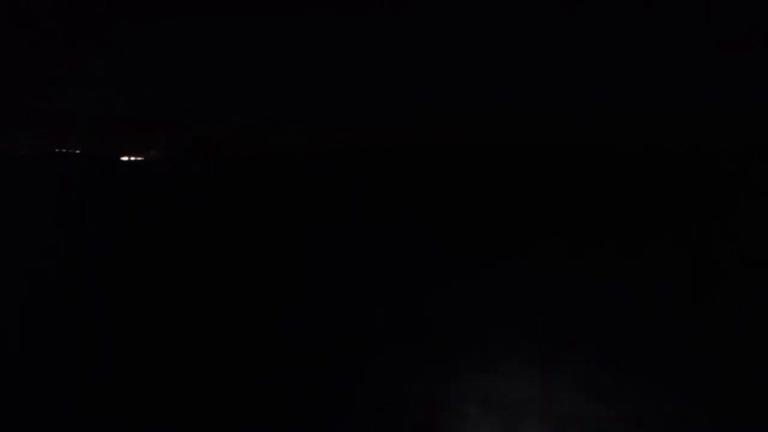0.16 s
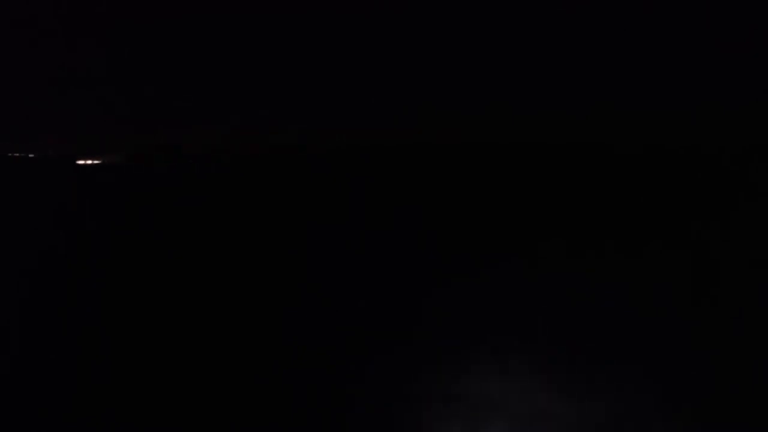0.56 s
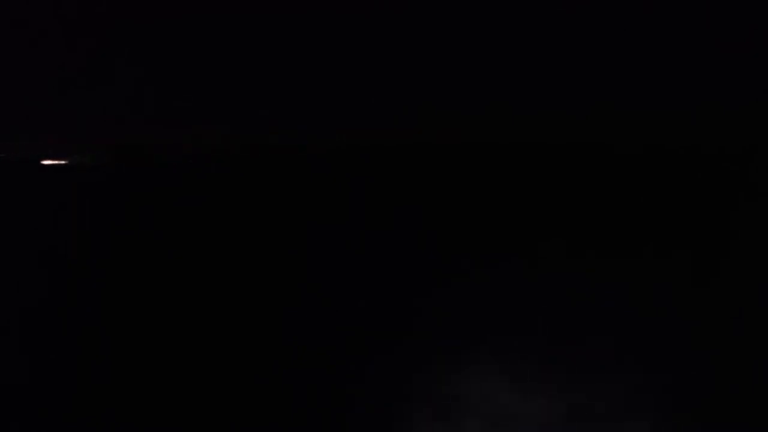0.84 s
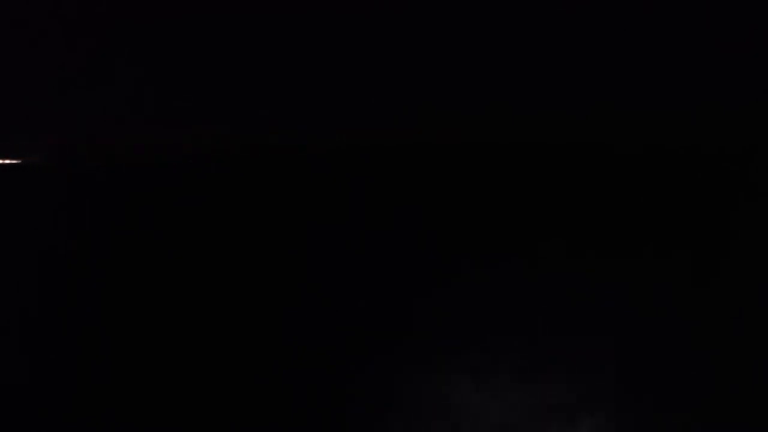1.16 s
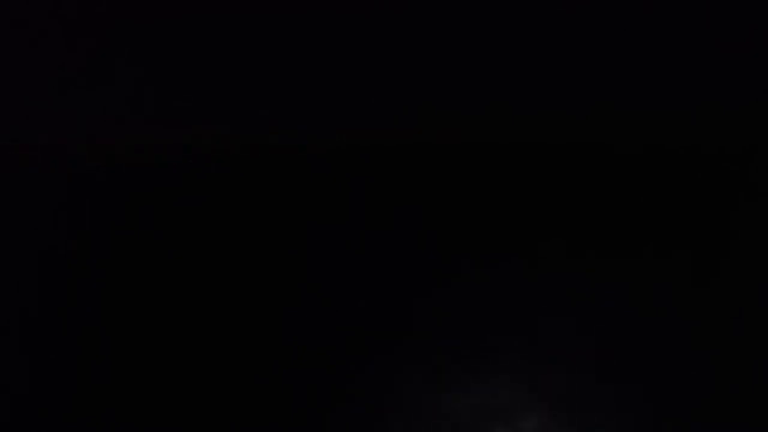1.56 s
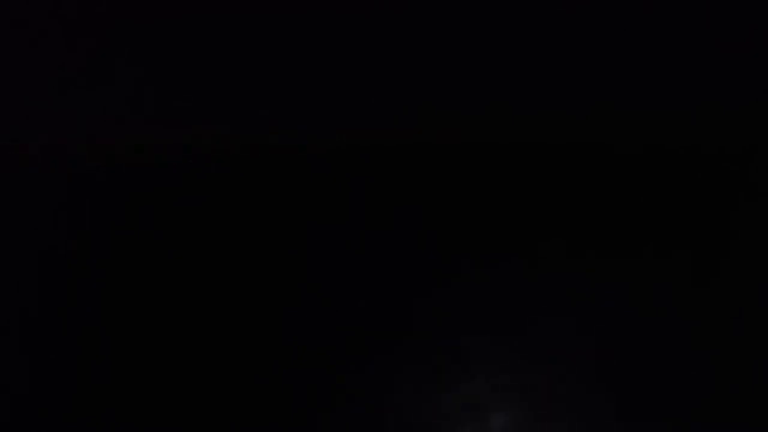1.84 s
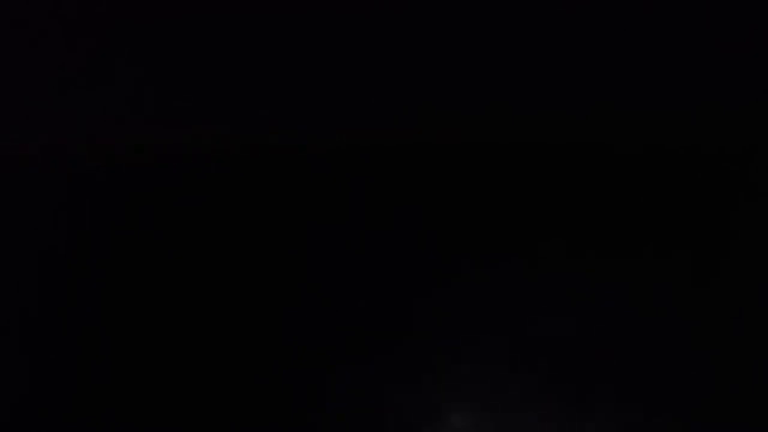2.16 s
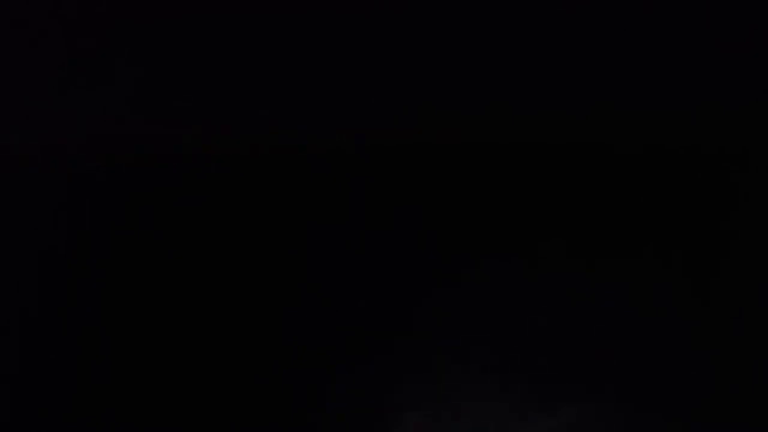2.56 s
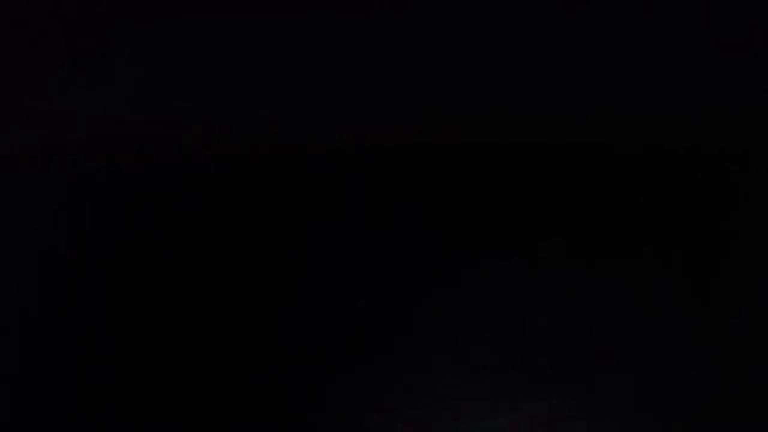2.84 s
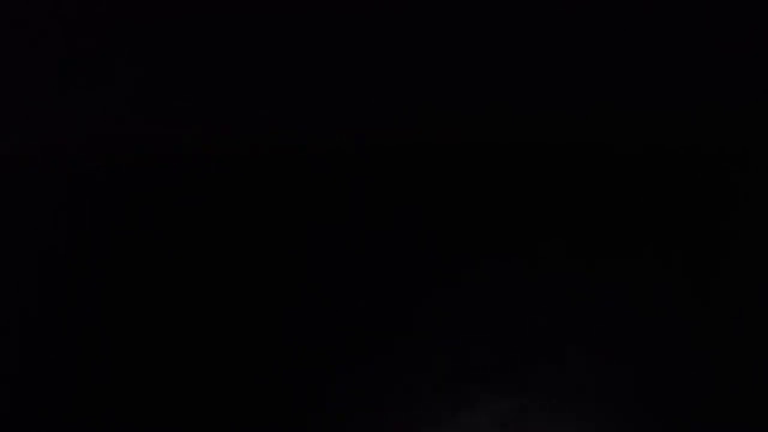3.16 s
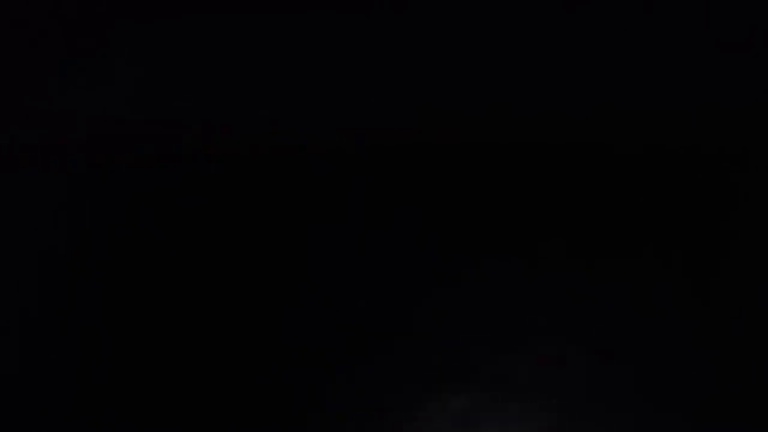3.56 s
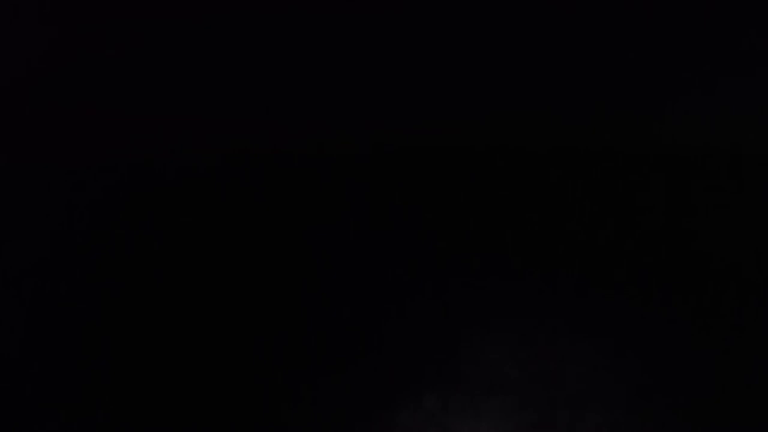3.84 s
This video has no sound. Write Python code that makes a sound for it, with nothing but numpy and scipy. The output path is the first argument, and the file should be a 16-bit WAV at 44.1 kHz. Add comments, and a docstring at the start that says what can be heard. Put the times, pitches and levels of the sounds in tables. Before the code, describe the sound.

Several toads trill in overlapping bursts of rapid, hollow clicks, nearest on the left, neighbours on the right, fainter ones beyond; open field at night, close stereo microphone, light diffuse echo, low rumble and faint hiss.

```python
"""Toads trill together in an open field at night: two on the left, several on the right, more beyond.
Each trill is a run of clicks; a click rings the vocal sac for a few milliseconds as its pitch drops,
with a short noisy rasp at its start. One short, high chip sounds in the centre.
The ground scatters the calls, over a low distant rumble and faint hiss."""
import sys
import numpy as np
from scipy import signal
from scipy.fft import rfft, irfft
from scipy.io import wavfile

SR = 44100
rng = np.random.default_rng(int(sys.argv[2]) if len(sys.argv) > 2 else 0)


def unload_audio(sound):
    """Save the sound as a 16-bit wav file, at the path given as the first command line argument."""
    columns = np.transpose(np.atleast_2d(sound))
    # keep every value between -1 and 1, then stretch to whole-number steps
    steps = np.round(np.clip(columns, -1, 1) * 32767)
    wavfile.write(sys.argv[1], SR, steps.astype(np.int16))


N = 175959  # samples, about 4 s

# Click levels in these tables are ring levels ahead of the throat filter and panning.
# clicks of the nearest toad, on the left: start_s, level_db
LEFT_CLICKS = [(0.0127, -17.5), (0.0526, -15.5), (0.085, -16), (0.1173, -14.5), (0.1493, -13.5),
               (0.1814, -13.5), (0.2161, -14.5), (0.248, -16.5), (0.2871, -16.5), (0.3007, -20.5),
               (0.6003, -15), (0.6458, -16.0), (0.6773, -15.5), (0.7069, -15.5), (0.7392, -15.5),
               (0.7757, -16), (0.8175, -15), (0.8466, -14.0), (0.8779, -15.5), (0.9166, -14.5),
               (0.9479, -14), (0.9779, -11.5), (1.0087, -21.5), (1.0469, -10.5), (1.0848, -13.5),
               (1.1111, -15), (1.1408, -14.5), (1.1803, -19), (1.4627, -17.0), (1.4931, -15.5),
               (1.5279, -16.5), (1.5627, -15.5), (1.5905, -14.5), (1.6219, -14.5), (1.6587, -14),
               (1.6865, -14), (1.7161, -15), (1.7464, -15), (1.7803, -13.5), (1.8098, -18.5),
               (1.8408, -14.0), (1.8763, -13.5), (1.9021, -15.5), (1.9284, -12.5), (1.9598, -14.5),
               (1.9959, -16.5), (2.2562, -18), (2.2851, -16), (2.3168, -17.5), (2.3607, -14.5),
               (2.3876, -15.5), (2.4168, -17.5), (2.4502, -16.5), (2.4881, -17.5), (2.5194, -13.5),
               (2.548, -15.5), (2.579, -16), (2.6112, -16.5), (2.6441, -13.5), (2.6729, -14),
               (2.7042, -14.5), (2.7313, -13.5), (2.7627, -15), (2.8041, -21.5), (2.8114, -16),
               (3.0578, -17), (3.1204, -14.5), (3.164, -16.5), (3.1886, -16.5), (3.2153, -12),
               (3.2459, -16.5), (3.2826, -15.5), (3.3116, -14.5), (3.3408, -15.5), (3.3734, -14.5),
               (3.4032, -15), (3.4316, -15.5), (3.4628, -16.5), (3.5026, -15.5), (3.5274, -20),
               (3.5536, -16), (3.5846, -16.5), (3.5986, -20), (3.8826, -17.5), (3.9135, -15),
               (3.9575, -15.0), (3.9837, -18)]
# its pitch as it drifts: time_s, pitch_hz
LEFT_PITCH = [(.2, 1544), (.7, 1530), (1.1, 1553), (1.65, 1519), (1.9, 1540), (2.3, 1486), (2.7, 1539),
              (3.15, 1500), (3.5, 1518), (3.9, 1474)]
# the microphone turns, so the left voices move further left: time_s, left_minus_right_db
LEFT_PAN = [(0, 4.5), (1.6, 7.5)]
# clicks of a softer, lower toad behind the nearest: start_s, level_db
BEHIND_CLICKS = [(0.2946, -24), (0.4535, -24.0), (0.479, -25.5), (0.5068, -24.5), (0.5358, -23),
                 (0.594, -27), (0.6245, -24.0), (0.661, -20.5), (0.7164, -24.5), (1.1986, -18.5),
                 (1.2195, -27), (1.3009, -19), (1.3592, -25), (1.7598, -23), (2.0193, -22.5),
                 (2.4053, -22.5), (2.4959, -24.5), (2.5897, -19.5), (2.757, -24.5), (2.787, -23),
                 (3.0874, -18), (3.1499, -24), (3.2384, -22), (3.2626, -26.5), (3.2938, -24), (3.3289, -24),
                 (3.3528, -27), (3.3813, -24.5), (3.442, -21.5), (3.539, -25.5), (3.6208, -23),
                 (3.8556, -18), (3.9355, -24)]
BEHIND_HZ = 1498.5
# clicks of the neighbours on the right: start_s, level_db
RIGHT_CLICKS = [(0.0203, -20.5), (0.029, -24.5), (0.0646, -17.5), (0.0733, -25.5), (0.1063, -22.5),
                (0.1115, -18.5), (0.1525, -23.5), (0.1909, -16), (0.2364, -18), (0.2748, -18.5),
                (0.3146, -17), (0.3261, -20), (0.362, -18.5), (0.4026, -20.5), (0.4314, -23),
                (0.4416, -16.5), (0.4661, -23), (0.4888, -19), (0.5239, -13.5), (0.5508, -19.5),
                (0.5632, -15), (0.5758, -23.5), (0.8721, -22), (0.8944, -20), (0.9293, -19),
                (0.9398, -23.5), (1.1261, -18), (1.1624, -15), (1.2035, -19), (1.237, -17.5),
                (1.2412, -19.5), (1.2671, -23.5), (1.2775, -16.5), (1.3178, -22), (1.3474, -23.5),
                (1.3689, -24.5), (1.3968, -20), (1.4224, -21.5), (1.4498, -24), (1.4765, -27.5),
                (1.5082, -31), (1.5404, -31.5), (1.7236, -20.0), (1.7748, -20.5), (1.8481, -19.5),
                (1.8903, -17), (1.9717, -20), (2.0085, -17), (2.0428, -22.5), (2.0548, -20.5),
                (2.0746, -21), (2.0986, -18.5), (2.1194, -23.5), (2.1393, -19.0), (2.1719, -23),
                (2.1841, -19.0), (2.1961, -25), (2.2201, -18.5), (2.231, -26.5), (2.2651, -17.5),
                (2.3014, -23.5), (2.3282, -24.0), (2.4358, -24.5), (2.4651, -22), (2.6992, -21),
                (2.7755, -19.5), (2.8238, -18.5), (2.866, -19), (2.9133, -20), (2.9521, -18.0),
                (3.0001, -19.5), (3.045, -19.5), (3.0846, -17), (3.1746, -19.5), (3.4202, -21.5),
                (3.4503, -24.5), (3.4914, -23), (3.5656, -18), (3.6138, -18.5), (3.6451, -22.5),
                (3.6536, -16.5), (3.6697, -21.5), (3.6988, -13.5), (3.734, -17.5), (3.7783, -17),
                (3.8233, -16), (3.8585, -18), (3.9019, -18.5), (3.9422, -16), (3.9777, -16)]
# pitch the right-hand clicks follow: time_s, pitch_hz
RIGHT_PITCH = [(.9, 1490), (1.2, 1554), (1.45, 1490), (2.202, 1554), (2.451, 1520), (2.95, 1534),
               (3.45, 1530), (3.85, 1557)]
# clicks of a small, bright-voiced toad on the right, in two calls: start_s, level_db
SMALL_CLICKS = [(0.01, -21), (0.049, -19.5), (0.0825, -21.5), (0.1274, -20.5), (0.1593, -19.5),
                (0.1971, -21), (0.2411, -20.0), (0.2773, -20.5), (0.3166, -20), (0.3507, -21),
                (0.39, -21.5), (0.425, -20), (0.4733, -24.5), (0.8435, -25), (0.8753, -21), (0.9088, -22.5),
                (0.948, -25), (0.9899, -20.5), (1.0238, -21.0), (1.0615, -20), (1.0951, -18.5),
                (1.1356, -18.5), (1.1703, -18), (1.2078, -19), (1.2445, -18), (1.2952, -23)]
SMALL_HZ = 1682.5

# further ring tones of each voice: pitch_multiple, level_db (relative to the main tone)
LEFT_OVERTONES = [(1.922, -33.5), (2.401, -38), (3.4, -49)]
RIGHT_OVERTONES = [(1.92, -28.5), (2.35, -33.5), (3.4, -38)]
SMALL_OVERTONES = [(0.909, -9.5), (1.999, -14)]
# the throat passes little below the ring and dips above it: frequency_hz, gain_db
THROAT = [(1050, -11.5), (1450, 0.5), (1900, -1), (2350, -5)]
# colour of the rasp at the start of each click: frequency_hz, gain_db
RASP_COLOUR = [(1000, -20), (3300, 7.5), (4400, -5.5), (5350, 0), (6500, -18), (9800, -8.5), (15000, -31.5)]
RASP_S = 0.0029  # time scale of the rasp's rise and fall
CHIRP, CHIRP_S = 0.053, 0.0054  # typical share a click starts sharp, and its settling time in s
PITCH_SCATTER = 0.01  # random spread of pitch from click to click, as a share
RING_SHAPE = 1.8  # exponent of the ring's decay

# toads farther off: nominal pitch, nominal click rate, middle level and spread either way
FAR_HZ, FAR_CLICKS_PER_S, FAR_DB, LEVEL_SCATTER_DB = 1541, 32, -32.5, 3
# gain on the farther toads, which fall quiet at times: time_s, gain_db
FAR_LEVEL = [(.66, 6), (.8, -23.5), (.9, 6), (2.1, -2), (3.6, 2), (3.75, -16)]
CHIP_S, CHIP_HZ, CHIP_DB, CHIP_DECAY_S = 2.7545, 3570, -39.5, 0.0038

# near and far echoes: level, decay time
SCATTER_DB, SCATTER_S, FIELD_DB, FIELD_S = -14, 0.004, -20, 0.074
# night background common to both sides: frequency_hz, level_db_per_hz (before the rumble swells)
NIGHT_MID = [(30, -101), (50, -83.5), (63, -88), (120, -80.5), (200, -76.5), (350, -88.5), (560, -86.5),
             (950, -90), (2600, -102), (3300, -99), (4400, -110), (5350, -104), (6500, -118), (7300, -117),
             (7700, -109), (8500, -113), (9000, -124), (9800, -106), (10700, -117), (15000, -126)]
# night background with opposite sign on the two sides: frequency_hz, level_db_per_hz (likewise)
NIGHT_SIDE = [(30, -112), (130, -93), (430, -91), (560, -83.5), (780, -88.5), (940, -72), (1200, -81.5),
              (2600, -101), (3600, -100), (4400, -111), (5400, -107), (6600, -120), (8300, -118),
              (9000, -126), (9800, -114), (13000, -129)]
# gain riding the low-mid rumble: time_s, gain_db
RUMBLE_LEVEL = [(.2, 4), (0.349, 4.5), (.5, 3), (.8, 4.5), (1.2, 1.5), (3.549, 3), (3.85, 5)]
TOP_HZ = 15200  # upper edge of the sound


def left_toad():
    """The nearest toad, round and clean, its pitch drifting from call to call, with a lower one behind it."""
    nearest = pitched(LEFT_CLICKS, LEFT_PITCH)
    behind = [(start, db, BEHIND_HZ) for start, db in BEHIND_CLICKS]
    return trill(nearest + behind, LEFT_OVERTONES, curve(LEFT_PAN),
                 attack_s=0.0011, decay_s=0.0061, rasp_db=-47)


def right_toads(pan_db=-10.0):
    """Neighbours whose trills interleave, with a harder tick."""
    clicks = pitched(RIGHT_CLICKS, RIGHT_PITCH)
    return trill(clicks, RIGHT_OVERTONES, pan_db, attack_s=0.00093, decay_s=0.0062, rasp_db=-43.5)


def small_toad(pan_db=-12):
    """A higher voice with two close ring tones and a strong octave."""
    clicks = [(start, db, SMALL_HZ) for start, db in SMALL_CLICKS]
    return trill(clicks, SMALL_OVERTONES, pan_db, attack_s=0.0014, decay_s=0.0062, rasp_db=-46.5)


def trill(clicks, overtones, pan_db, attack_s, decay_s, rasp_db):
    """Clicks (s, dB, Hz) of one voice: a tick, then the sac swells, rings and sags in pitch."""
    rings, ticks = np.zeros((2, N)), np.zeros((2, N))
    lag = np.array([[0], [1 / SR]])  # the right ear hears one sample later
    t = np.maximum(np.arange(900) / SR - lag, 0)  # each click lasts about 20 ms
    snap = t / RASP_S * np.exp(1 - (t / RASP_S) ** 2)
    for (start, db, hz), luck in zip(clicks, rng.standard_normal((len(clicks), 8))):
        # each click differs a little in attack, decay, pitch and sag
        click_attack_s = attack_s * np.exp(0.16 * luck[-1])
        click_decay_s = decay_s * np.exp(0.12 * luck[0])
        click_hz = hz * (1 + PITCH_SCATTER * luck[1])
        click_chirp = CHIRP * np.exp(0.2 * luck[-2])

        swell = (1 - np.exp(-(t / click_attack_s) ** 2)) ** 2
        # the ring holds briefly, then dies ever faster
        ring = swell * np.exp(-(t / click_decay_s) ** RING_SHAPE)
        ring = ring / ring.max()
        # extra phase from starting sharp and settling to the pitch
        sag = click_chirp * CHIRP_S * (1 - np.exp(-t / CHIRP_S))
        phase = 2 * np.pi * click_hz * (t + sag)
        upper = sum(undb(tone_db) * np.sin(multiple * phase + offset)
                    for (multiple, tone_db), offset in zip(overtones, luck[2:]))
        add(rings, start, undb(db) * ring * (np.sin(phase) + ring * upper))  # overtones die sooner
        add(ticks, start, undb(db / 2) * snap)  # the tick varies less than the ring
    voice = colour(rings, THROAT)
    rasp = undb(rasp_db) * colour(ticks * rng.standard_normal(N), RASP_COLOUR)
    # positive pan softens the right ear, negative the left
    ears = undb(np.minimum(np.array([[1], [-1]]) * pan_db, 0))
    return ears * (voice + rasp)


def pitched(clicks, pitch):
    """Give each click the pitch that the voice has at that moment."""
    times, hz = np.array(pitch).T
    return [(start, db, np.interp(start, times, hz)) for start, db in clicks]


def chip():
    """A single high, short chip in the centre, rung like a toad's click."""
    return trill([(CHIP_S, CHIP_DB, CHIP_HZ)], [], 0,
                 attack_s=0.00072, decay_s=CHIP_DECAY_S, rasp_db=-51.5)


def far_toads(pan_db=6):
    """Faint trills on either side, uneven in time, strength and pitch."""
    out = 0
    for side in (1, -1):
        gap, size, turn = rng.uniform(-1, 1, (160, 3)).T  # enough clicks to outlast the scene
        times = np.cumsum(np.exp(gap / 2)) / FAR_CLICKS_PER_S
        levels = FAR_DB + LEVEL_SCATTER_DB * size
        pitches = FAR_HZ * (1 + 0.035 * turn)
        clicks = np.column_stack([times, levels, pitches])
        out = out + trill(clicks, [], side * pan_db, attack_s=0.00091, decay_s=0.0052, rasp_db=-43.5)
    return out * undb(curve(FAR_LEVEL))


def echoes(x, db, decay_s):
    """Diffuse reflections from grass and ground: a decaying noise tail, different at each ear."""
    t = np.arange(SR // 2) / SR
    onset = 1 - np.exp(-(t / 0.0005) ** 2)
    tail = rng.standard_normal((2, len(t))) * np.exp(-t / decay_s) * onset
    tail = tail / np.sqrt(np.sum(tail ** 2, axis=1, keepdims=True))  # unit energy
    crossed = x + 0.21 * x[::-1]  # some of each side reaches the other
    return undb(db) * signal.fftconvolve(crossed, tail, axes=1)[:, :N]


def night():
    """Distant rumble that swells a little, and thin steady hiss, both from filtered noise."""
    mid, side = rng.standard_normal((2, N)) * np.sqrt(SR / 2)  # 0 dB per Hz
    air = colour(mid, NIGHT_MID) + colour(side, NIGHT_SIDE) * np.array([[1], [-1]])
    rumble = colour(air, [(130, -27.0), (290, 4.0), (650, -2), (1100, -27)])
    swell = undb(curve(RUMBLE_LEVEL))
    return air + (swell - 1) * rumble


def undb(db):
    """Turn decibels into an amplitude factor."""
    return 10 ** (np.asarray(db) / 20)


def curve(points):
    """Join (s, value) points over the whole duration."""
    times, values = np.array(points).T
    return np.interp(np.arange(N) / SR, times, values)


def colour(x, points):
    """Filter by a curve of (Hz, dB) points, joined on a log frequency scale."""
    hz, db = np.array(points).T
    f = np.maximum(np.fft.rfftfreq(N, 1 / SR), 1)
    gain = undb(np.interp(np.log(f), np.log(hz), db))
    return irfft(rfft(x) * gain, N)


def add(out, start, sound):
    """Mix a stereo sound in at a time in seconds."""
    i = max(int(start * SR), 0)
    if i < N:
        out[:, i:i + sound.shape[1]] += sound[:, :N - i]


def scene():
    """The chorus, its echoes and the night behind it."""
    background = night()
    toads = left_toad() + right_toads() + small_toad() + chip() + far_toads()
    near_echoes = echoes(toads, SCATTER_DB, SCATTER_S)
    far_echoes = echoes(toads, FIELD_DB, FIELD_S)
    return toads + near_echoes + far_echoes + background


def record(dry):
    """A steep low-pass cuts the top of the sound."""
    low_pass = signal.ellip(8, .2, 70, TOP_HZ, fs=SR, output="sos")
    return signal.sosfilt(low_pass, dry)


dry = scene()
out = record(dry)
unload_audio(out)
```